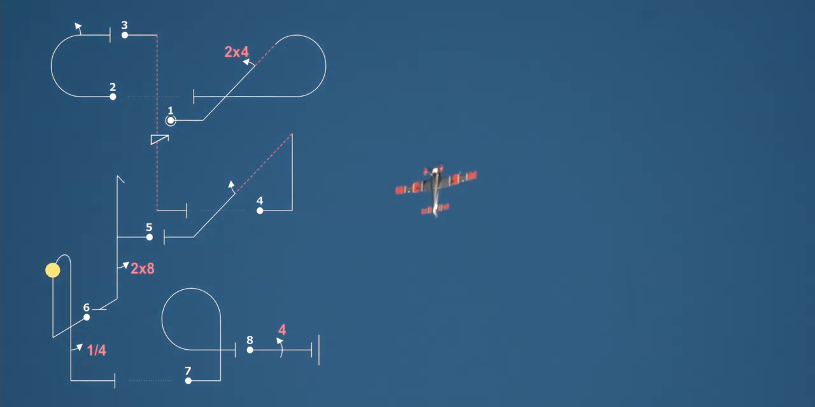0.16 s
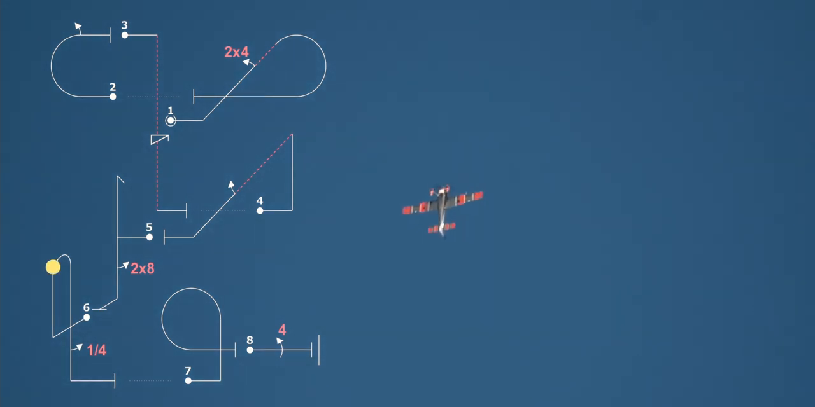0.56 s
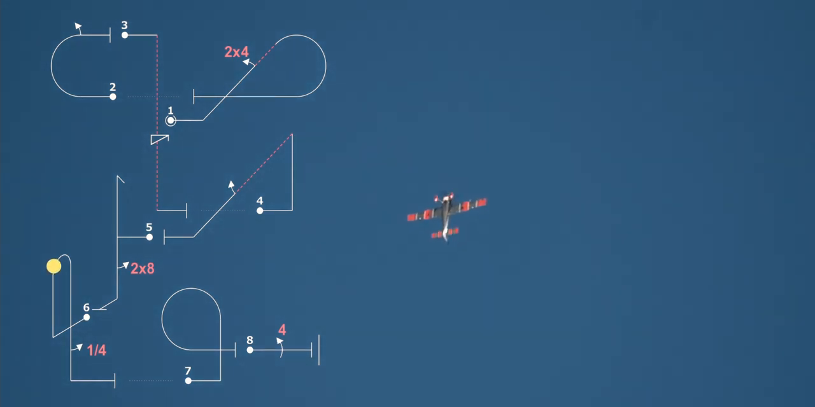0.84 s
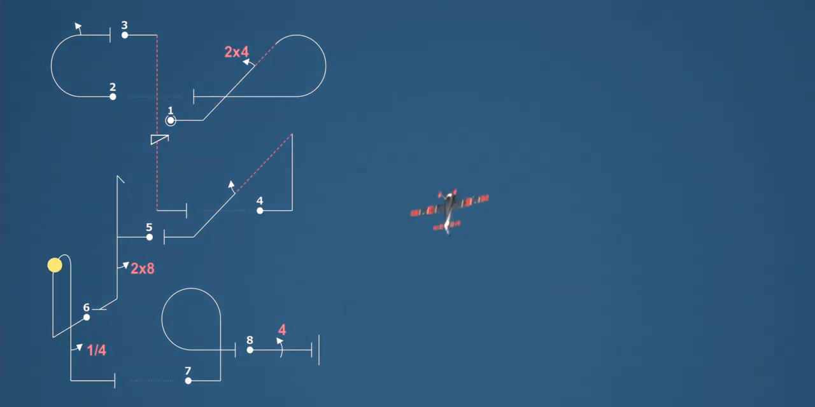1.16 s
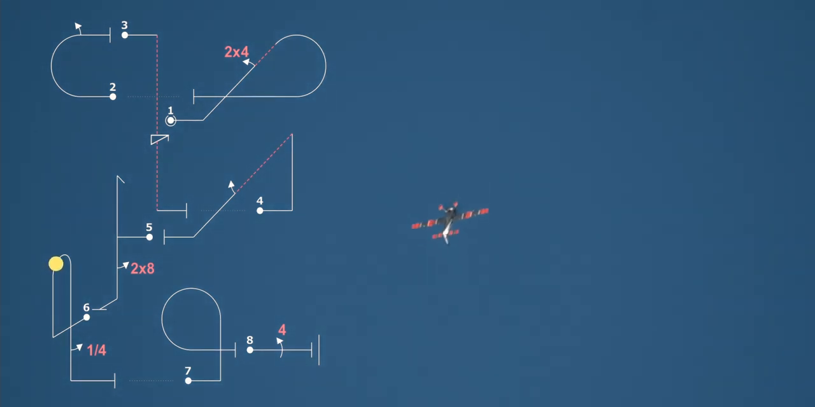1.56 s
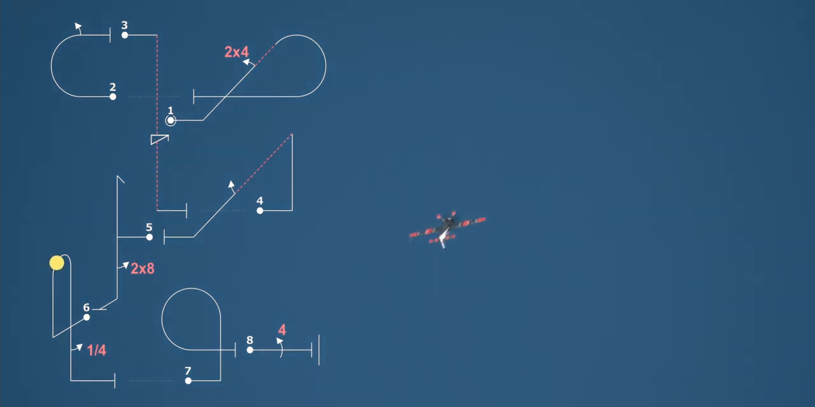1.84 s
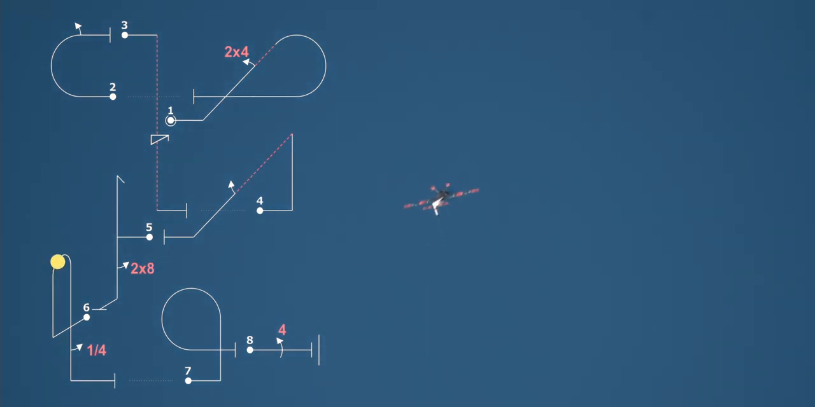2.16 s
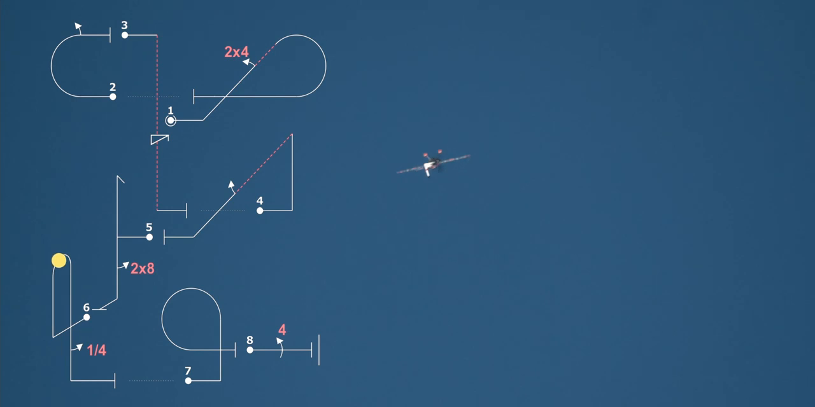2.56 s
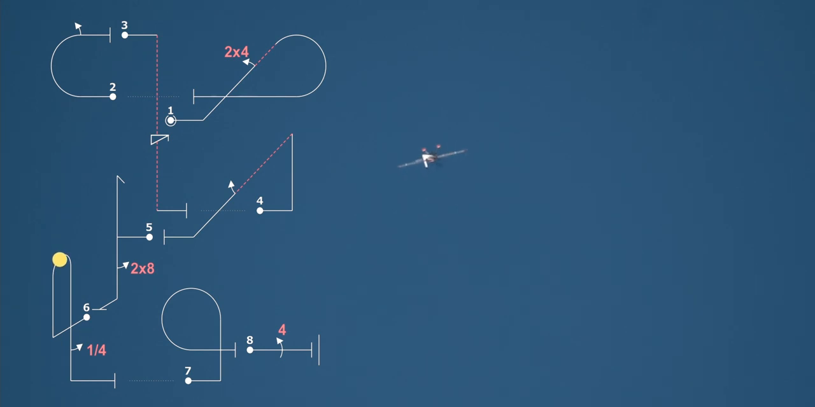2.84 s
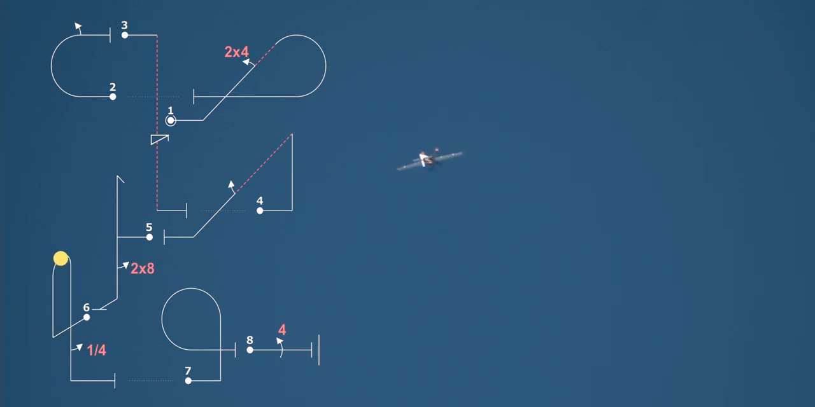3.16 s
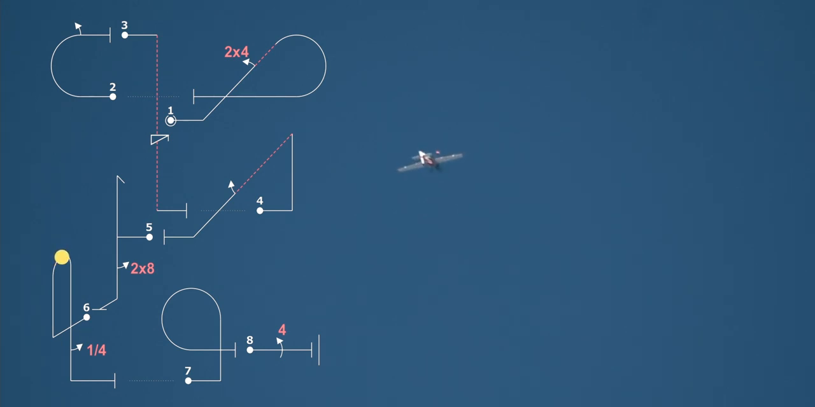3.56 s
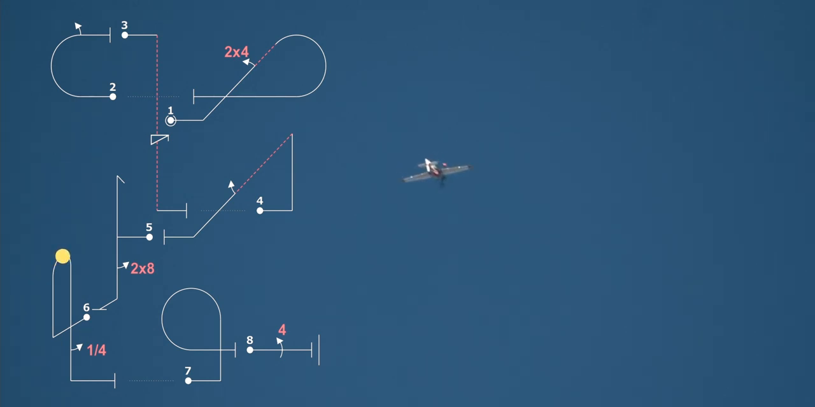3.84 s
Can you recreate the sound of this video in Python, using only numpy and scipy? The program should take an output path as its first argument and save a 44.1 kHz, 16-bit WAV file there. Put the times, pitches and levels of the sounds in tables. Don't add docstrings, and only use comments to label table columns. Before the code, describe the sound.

A small propeller aircraft, already loud, drones high in open sky. Its dense, throaty blade buzz swells around 0.3 and 0.55 seconds while the pitch sags about three semitones, mostly by 1.5. The blade buzz collapses near 1.1, leaving a quieter, rough six-cylinder exhaust hum at nearly steady pitch, fluttering and wavering through air until 4 seconds, with soft roar, low wash, brief faint fizz and stereo camera hiss.

```python
import sys
import numpy as np
from scipy import signal
from scipy.fft import rfft, irfft
from scipy.io import wavfile
from scipy.ndimage import uniform_filter1d, map_coordinates

SR = 44100
rng = np.random.default_rng(int(sys.argv[2]) if len(sys.argv) > 2 else 0)


def attenuation_scalar(level_db):
    decades = np.asarray(level_db, float) / 20
    return 10 ** decades


def to_wav(sig):
    pcm = np.clip(np.atleast_2d(sig), -1, 1) * 32767
    pcm = np.round(pcm).astype(np.int16)
    wavfile.write(sys.argv[1], SR, pcm.T)


N = 176400

# start_s, thump_db, drone_db
BEAM = [
    (0, -27.5, -30.5),
    (.4, -28, -26.5),
    (.62, -31.5, -23.5),
    (.85, -36.5, -24.5),
    (1.05, -42.5, -27.5),
    (1.4, -52.5, -34.5),
    (2.2, -50.5, -37),
    (3.1, -50, -42),
    (4, -56, -43),
]
# pitch_hz, likeness (1 = identical)
ALIKE = [(60, 1), (125, .9998), (300, .9988), (600, .965), (1200, .92), (2000, .5), (3500, .25)]


def unit(x):
    return x / np.sqrt(np.mean(x ** 2) + 1e-20)


def along(points, hz):
    f, v = np.transpose(points)
    return np.interp(np.log(hz + 1), np.log(f + 1), v)


def curves(rows):
    s, *columns = np.transpose(rows)
    return [np.interp(np.arange(N) / SR, s, column) for column in columns]


def wobble(rate):
    knots = rng.standard_normal(400)
    places = np.arange(0, N, 16) * rate / SR
    return map_coordinates(knots, [places]).repeat(16)[:N]


def eddies(hz, t):
    # start_s (its centre), gain_db, half_length_s, best_focused_hz
    lenses = [(.14, 7, .045, 1100), (.565, 13, .04, 1150), (.63, 8, .04, 1400), (.86, 6, .05, 1150),
              (1.04, 6, .05, 1100), (1.56, 7, .05, 1050), (2.18, 5, .1, 1200), (2.44, 8, .045, 1400),
              (2.67, 9, .05, 1250), (2.95, 6, .11, 1400), (3.33, 8, .05, 1200), (3.47, 6, .06, 1050),
              (3.57, 7, .04, 1950), (3.82, 7, .07, 1500)]
    width_octaves = .42
    gain_db = 0
    for s, db, half_s, best_hz in lenses:
        passing = ((t - s) / half_s) ** 2
        off_pitch = (np.log2((hz + 1) / best_hz) / width_octaves) ** 2
        gain_db = gain_db + db * np.exp(-.5 * passing - .5 * off_pitch)
    return gain_db


def focus_db(hz):
    return eddies(hz, np.arange(0, N, 64) / SR).repeat(64)[:N]


def tone(turns, hz, db, twinkle_db, drift, flicker=6):
    apart = np.arccos(np.clip(along(ALIKE, hz), -1, 1)) / 2 * wobble(rate=5.1)
    phase = 2 * np.pi * turns + drift * hz / 400 * wobble(rate=6)
    level = np.sqrt(2) * attenuation_scalar(db + twinkle_db * wobble(rate=flicker))
    return level * np.cos(phase + [apart, -apart])


def propeller(turns):
    # start_s, level_db
    disc = [
        (0, -25),
        (.13, -19.5),
        (.3, -17.5),
        (.42, -24),
        (.55, -16.5),
        (.7, -21.5),
        (.87, -22.5),
        (1.06, -30),
        (1.18, -46),
        (4, -70),
    ]
    # multiple of the blade rate, level_db under the disc, share of the eddies' focus
    overtones = [(4, -12, 0.65), (5, -14.5, 1.4), (6, -7.5, 1.3), (7, -8, 0.7), (8, -13, 0.69),
                 (9, -16, 0.52), (10, -23.5, 1), (11, -31.5, 0.37), (12, -38, 0.55)]
    pulse_lag = .2
    dull_db_per_s = 8
    thump_db, drone_db = curves(BEAM)
    disc_db, = curves(disc)
    out = tone(turns - pulse_lag, 125, thump_db, twinkle_db=1.65, drift=.2)
    out += tone(2 * turns, 250, drone_db, twinkle_db=0.96, drift=0.089)
    out += tone(3 * turns - pulse_lag, 375, disc_db, twinkle_db=.3, drift=.2)
    mean_db = uniform_filter1d(disc_db, size=SR // 3, mode="nearest")
    t = np.arange(N) / SR
    for k, db, share in overtones:
        level_db = db + mean_db + share * focus_db(130 * k) - dull_db_per_s * (k - 4) * t
        lagging = round(k) * turns - pulse_lag * (k - 2)
        out += tone(lagging, 125 * k, level_db, twinkle_db=.8 + .35 * k, drift=.45, flicker=14)
    return out


def exhaust(cycles, cycle_hz):
    # start_s, level_db
    facing = [(0, -22.5), (.4, -8), (.8, -1.5), (1.3, -6.5), (1.55, -3), (2, -4.5), (2.6, -1.5), (3.2, -6),
              (3.5, -4), (3.75, -0.5), (4, -4.5)]
    # order of the engine cycle, level_db
    orders = [(8, -54), (9, -59.5), (10, -55), (11, -52), (14, -83.5), (15, -52.5), (16, -41.5),
              (17, -39.5), (18, -33.5), (19, -40), (20, -33), (21, -48), (23, -51), (24, -48), (25, -64),
              (26, -44.5), (27, -49.5), (28, -55.5), (29, -62), (30, -49.5), (32, -61), (35, -55),
              (36, -42.5), (37, -64.5), (38, -49), (42, -61), (44, -55), (48, -65), (54, -55.5), (60, -63)]
    # pitch_hz, level_db
    ground = [(380, 0), (405, 0), (432, -21.5), (460, 6), (500, -0.5)]
    far_pipe = (16, 17, 21, 28, 32)
    far_lag, muffler_order = .36, 22
    out = 0
    for k, db in orders:
        lead = far_lag * (round(k) not in far_pipe) + (k > muffler_order) / 4
        bounce_db = along(ground, k * cycle_hz[::64]).repeat(64)[:N]
        level_db = db + bounce_db + 0.4 * focus_db(20 * k)
        out += tone(round(k) * cycles + lead, 20 * k, level_db, twinkle_db=2.1, drift=.27)
    return attenuation_scalar(curves(facing)[0]) * out


def rush(spectrum, alike, patchy_db, focused=0):
    f, t, z = signal.stft(rng.standard_normal((2, N)), SR, nperseg=512)
    field = uniform_filter1d(rng.standard_normal(z.shape[1:]), size=4, axis=0)
    field = uniform_filter1d(field, size=16, axis=1)
    gain_db = patchy_db * unit(field) + focused * eddies(f[:, None], t)
    pair = signal.istft(z * attenuation_scalar(gain_db), nperseg=512)[1][:, :N]
    hz = np.fft.rfftfreq(N, 1 / SR)
    turn = np.arccos(np.clip(along(alike, hz), -1, 1)) / 2
    closed = [(spectrum[0][0] / 2, -120), *spectrum, (2 * spectrum[-1][0], -120)]
    shaped = rfft(pair) * attenuation_scalar(along(closed, hz))
    mid, side = irfft(shaped * [np.cos(turn), np.sin(turn)], N)
    return unit(np.array([mid + side, mid - side]))


def exhaust_roar(turns):
    # start_s, level_db
    still = [(0, -31), (.35, -37), (.75, -38.5), (1.25, -39), (2, -40.5), (3, -40), (4, -42.5)]
    # pitch_hz, level_db per Hz
    colour = [(500, -5.5), (800, -0.5), (1100, 1), (1600, -7), (1750, -10.5), (2100, -13), (2600, -24.5),
              (4000, -32.5)]
    firing = 0.33 * np.cos(2 * np.pi * turns)
    cycle = 0.1 * np.cos(2 * np.pi * turns / 6)
    puffs = unit(1 + firing + cycle)
    level = attenuation_scalar(curves(still)[0] + .6 * wobble(rate=11))
    return level * puffs * rush(colour, ALIKE, patchy_db=1.6, focused=1)


def prop_wash():
    # pitch_hz, level_db per Hz
    colour = [(25, -19.5), (60, -14), (105, -2), (200, 1.5), (380, 6), (430, -1), (700, -8), (1200, -35)]
    thump_db = curves(BEAM)[0]
    level_db = -42.5 + 0.25 * (thump_db + 53.5) + 3.3 * wobble(rate=1.8)
    return attenuation_scalar(level_db) * rush(colour, ALIKE, patchy_db=1.5)


def throb():
    # pitch_hz, level_db per Hz
    colour = [(140, -21), (185, -4.5), (225, -5.5), (280, -21)]
    level_db = -10 + curves(BEAM)[0] + 3 * wobble(rate=7)
    return attenuation_scalar(level_db) * rush(colour, ALIKE, patchy_db=1.5)


def slipstream_fizz():
    # start_s, level_db
    slip = [(0, -64.5), (.8, -63), (1.15, -66.5), (1.45, -59.5), (2, -70), (4, -88)]
    # pitch_hz, level_db per Hz
    colour = [(1800, -11.5), (2600, 2.5), (3600, -7.5), (4600, -6.5), (5500, -29)]
    return attenuation_scalar(curves(slip)[0]) * rush(colour, ALIKE, patchy_db=0.1)


def scene():
    # start_s, pitch_hz (blade rate)
    pitch = [(0, 140.6), (.15, 137), (.4, 132.3), (.7, 127), (1, 122.6), (1.25, 119.9), (1.5, 118.2),
             (1.8, 117.2), (2.15, 116.45), (2.8, 116.25), (3.5, 116.3), (4, 116.8)]
    blade_hz = curves(pitch)[0]
    turns = .33 + np.cumsum(blade_hz) / SR
    tones = propeller(turns) + exhaust(turns / 6, blade_hz / 6)
    return tones + exhaust_roar(turns) + prop_wash() + throb() + slipstream_fizz()


def camera_hiss():
    # pitch_hz, level_db per Hz
    colour = [(300, 11.5), (3000, 3.5), (6000, 2), (10000, 0), (15500, -3.5)]
    duck_db = .08
    level_db = -63 - duck_db * (curves(BEAM)[0] + 46)
    port_gain = attenuation_scalar([[.15], [-.15]])
    return port_gain * attenuation_scalar(level_db) * rush(colour, [(1000, .22), (15000, 0.14)], patchy_db=0.3)


def low_pass(x):
    return signal.sosfilt(signal.butter(12, 15770, fs=SR, output="sos"), x)


def record(dry):
    rise_s, rise_from = .002, .35
    fade_in = np.minimum(rise_from + np.arange(N) / SR / rise_s, 1)
    return low_pass(fade_in * dry + camera_hiss())


dry = scene()
out = record(dry)
to_wav(out)
```